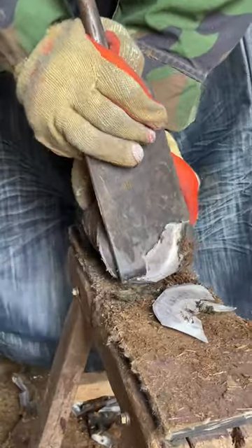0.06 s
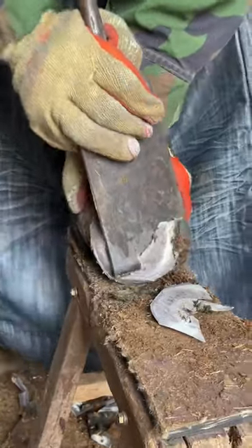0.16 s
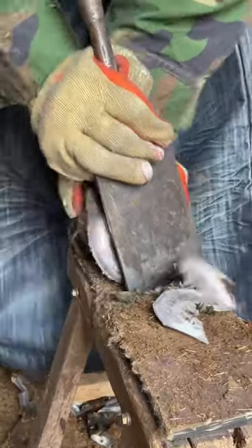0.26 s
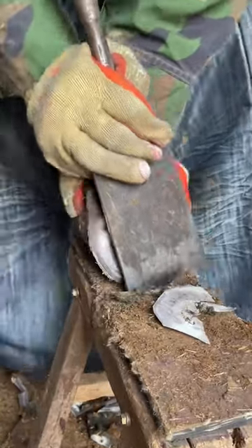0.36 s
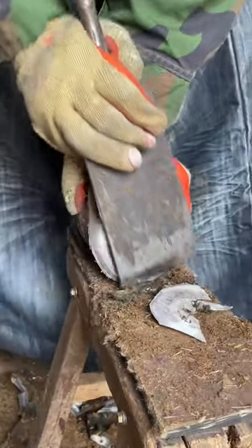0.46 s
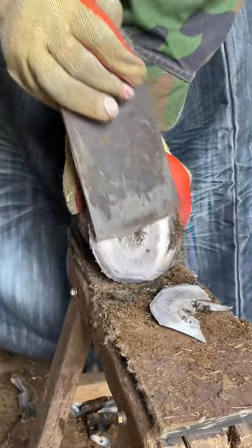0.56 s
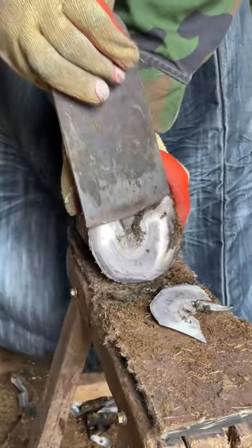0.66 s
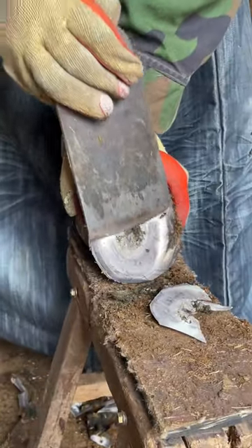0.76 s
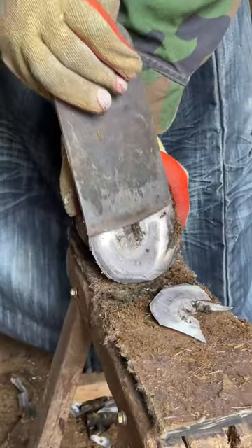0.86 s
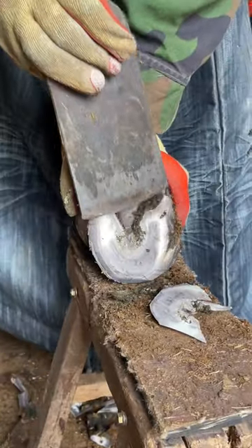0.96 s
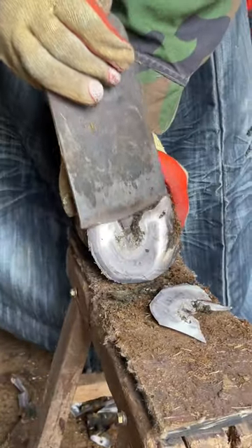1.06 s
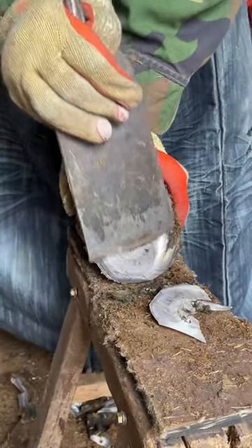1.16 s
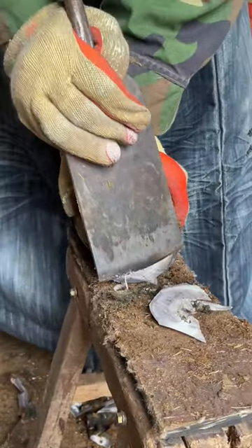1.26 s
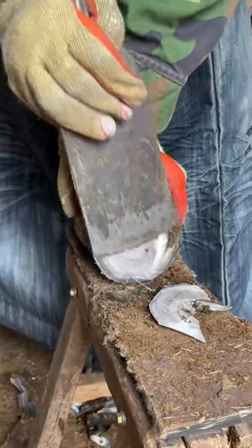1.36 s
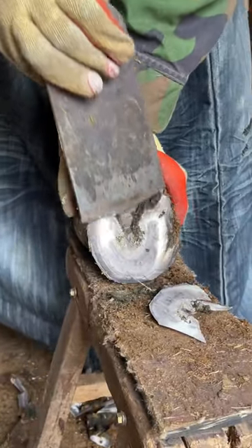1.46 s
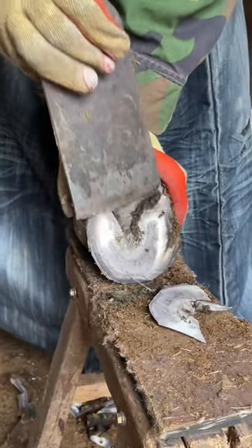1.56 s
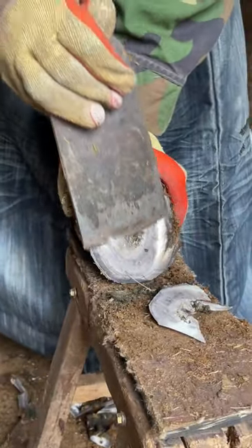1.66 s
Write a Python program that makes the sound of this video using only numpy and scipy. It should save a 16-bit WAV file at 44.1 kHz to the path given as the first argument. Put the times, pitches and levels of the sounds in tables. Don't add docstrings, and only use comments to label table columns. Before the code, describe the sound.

A flat blade pares a hoof: faint scraping, a few crackles, then one hard sharp snap with a short woody thud, a smaller knock, and quiet dry scraping; close stereo microphones in a quiet yard.

```python
import sys
import numpy as np
from scipy import signal
from scipy.fft import rfft, irfft, next_fast_len
from scipy.io import wavfile
from scipy.ndimage import uniform_filter1d, map_coordinates

SR = 44100
rng = np.random.default_rng(int(sys.argv[2]) if len(sys.argv) > 2 else 0)


def volts_from_db(level):
    exponent = np.asarray(level, float) / 20
    return 10 ** exponent


def persist_wave(psi):
    counts = np.round(np.clip(psi, -1, 1) * 32767).astype(np.int16)
    wavfile.write(sys.argv[1], SR, np.atleast_2d(counts).T)


N = 74970

# [t/s, peak level/dB, t60/s, tilt/(dB per octave)]
FIBRE_SNAPS = [(.008, -31.5, 0.024, 6), (0.162, -26, 0.013, 13.5), (0.187, -36, 0.022, 42),
               (0.1984, -16, 0.0076, 9.5), (0.2069, -23, 0.081, 1), (0.2121, -22, 0.011, -17),
               (0.2271, -19.5, 0.025, 2), (0.2484, -34, .02, 4), (0.2514, 0, 0.0028, -1),
               (0.2525, -4, 0.014, -0.5), (0.2549, -1, 0.0035, -4.5), (0.2556, -9.5, 0.026, -10.5),
               (.432, -21.5, 0.0086, -2.5), (0.441, -28.5, 0.033, -11.5), (.456, -33, 0.027, -19),
               (0.465, -36.5, 0.021, 3), (0.519, -32, 0.019, 22), (0.564, -38, 0.013, 10),
               (0.6107, -30.5, 0.011, 2), (.624, -39.5, 0.0049, 20), (.678, -38, 0.027, -6),
               (0.748, -39.5, 0.018, -2.5), (1.316, -40, 0.02, 9.5), (1.53, -43.5, 0.023, 14)]
# [f/Hz, level/(dB per Hz)]
CRACK_SPECTRUM = [(250, -42), (800, -12), (1800, -1), (4100, -6.5), (5200, -4), (9500, -9), (12000, -27),
                  (15500, -53)]
SNAP_RISE_S, SNAP_RING_DB = 0.00011, -30
SPIKE, SPIKE_S = 1.5, .0007
SNAP_TILT_TOP_HZ = 8000
# [t/s, level/dB]
TEAR_LEVEL = [(.183, -80), (.188, -48), (.2, -42), (.222, -44), (.243, -40), (.251, -27), (.262, -34),
              (.3, -51), (.35, -72)]

# [f/Hz, width/Hz, level/dB]
BLADE_MODES = [(950, 54, -9), (1535, 122, 1), (2273, 89, 1), (3410, 79, -8), (4790, 80, 2.5),
               (5596, 60, 2.5), (6200, 76, -1), (7300, 410, -5), (8390, 130, 4), (9030, 230, -0.5),
               (9200, 170, 0), (10580, 127, 3), (12800, 93, -1), (14900, 74, 10)]
BURIED_DAMPING = 3

# [t/s, f/Hz, peak level/dB, length/s, lean (below
KNOCKS = [(.198, 2330, -29, 0.011, 0.3), (.2058, 2260, -32, 0.0057, 0.38), (0.2084, 1740, -34, 0.013, 1),
          (0.2236, 418, -21.5, 0.0057, 0.81), (0.2295, 208, -29.5, 0.01, 0.84),
          (0.225, 950, -25.5, 0.0082, 0.64), (.249, 1870, -17, 0.0026, .8),
          (0.2534, 1511, -16.5, 0.01, 0.85), (0.2547, 412, -11, 0.0081, 1.15),
          (0.2554, 243.6, -19, 0.026, 0.61), (.2575, 515, -26, 0.0064, 1.75),
          (0.2599, 116.5, -14.5, 0.022, 0.5), (0.264, 430, -26, 0.012, 0.35),
          (.265, 930, -24.5, 0.0074, 0.36), (0.5073, 296, -25.5, 0.015, 0.57),
          (0.5153, 281, -27, 0.014, 1.9), (.746, 2270, -51, .04, 0.24), (.52, 2264, -53.5, 0.056, 1),
          (.432, 1044, -39, 0.006, 0.66), (.452, 1510, -42, 0.013, .9), (1.14, 2285, -42.5, 0.051, 1.3),
          (1.386, 2290, -51, 0.052, 0.69), (1.382, 1440, -52, 0.046, 0.85),
          (1.497, 2290, -51.5, 0.063, 0.5), (.025, 69, -35.5, .06, 1), (.199, 727, -32.5, 0.0056, 0.81),
          (.2272, 2000, -25.5, .004, .6), (.335, 261, -44.5, 0.06, 0.97), (.549, 178, -34, 0.014, 0.39),
          (.585, 219.3, -44.5, 0.053, 1.3), (.735, 173, -43.5, 0.045, 1.2), (1.62, 449, -53.5, 0.057, 0.71),
          (1.197, 208.5, -41.5, .061, 0.73), (1.42, 171.4, -42, 0.055, 0.96)]
# [f/Hz, t60/s]
RATTLE_DECAY = [(200, .35), (1000, .3)]
RATTLE_DB = -19

# [t/s, level/dB]
SCRAPE_LEVEL = [(0, -50.5), (.14, -57.5), (.3, -46.5), (.38, -48.5), (.44, -40.5), (.55, -50.5),
                (.72, -52.5), (.8, -62), (.86, -55.5), (1.07, -57), (1.16, -52), (1.26, -53), (1.285, -61),
                (1.33, -58), (1.46, -59.5), (1.52, -56.5), (1.6, -60), (1.7, -52)]
# [t/s, level/dB]
RING_LEVEL = [(0, -8.5), (.46, -15.5), (.54, -9), (.8, -9.5), (1.08, 2), (1.13, 4.5), (1.165, 3),
              (1.25, -1), (1.3, -11.5), (1.36, 1), (1.41, 8.5), (1.46, 0.5), (1.52, 1.5), (1.56, -4),
              (1.6, 4), (1.7, 8.5)]
# [f/Hz, level/(dB per Hz)]
HORN_SPECTRUM = [(300, 6.5), (700, 1.5), (1500, -4), (3000, -1.5), (4200, -4.5), (9500, -7), (11500, -26.5),
                 (15000, -46)]
SLIPS_PER_S, SLIP_SPREAD_DB = 1900, 3.5
FRICTION_GRIT, TEAR_GRIT = 0.58, 0.97
HISS_PATCHY_DB, RING_PATCHY_DB = 3, 2.5

# [t/s, resonance f/Hz, level/dB]
SLIDE = [(1.318, 6700, -75), (1.335, 6500, -57), (1.343, 5800, -58), (1.352, 5600, -61), (1.356, 3700, -61),
         (1.372, 3700, -55), (1.405, 3650, -58), (1.42, 3250, -55), (1.45, 2800, -70)]
SLIDE_WIDTH_HZ = 800
# [t/s, f/Hz, peak level/dB, length/s, lean]
FLECKS = [(.04, 11500, -69.5, .05, 2.1), (.468, 11600, -54.5, .014, 0.97), (.462, 9400, -52, .018, .6),
          (.5, 8000, -48, 0.028, 1), (.556, 14600, -68, .012, 1), (.55, 12840, -71, .04, 1),
          (.56, 6540, -53, 0.0092, .8), (.586, 9000, -50, .014, .7), (.677, 5600, -41, 0.0052, 0.61),
          (1.02, 2030, -54.5, 0.054, 1.3), (1.085, 15200, -76, .05, 1.2), (1.33, 12800, -92, 0.11, 1.1),
          (1.49, 14200, -75, .04, 1), (1.63, 14900, -72, .04, 1)]

# [t/s, length/s, level/dB]
DUST_PUFFS = [
    (0.257, .075, -64),
    (0.444, 0.081, -66),
    (0.494, 0.052, -66),
    (0.542, 0.039, -68),
    (0.71, 0.055, -73),
    (0.832, .045, -75.5),
    (1.08, 0.078, -69.5),
    (1.31, 0.031, -78),
    (1.612, 0.091, -67),
]
# [f/Hz, level/(dB per Hz)]
DUST_SPECTRUM = [(9500, -56), (11200, 9), (12500, -3), (15500, -5.5)]

# [f/Hz, t60/s]
ECHO_DECAY = [(200, 0.6), (1000, 0.23), (3000, 0.061), (8000, 0.055)]
ECHO_DB = -12
# [t/s, level/dB]
RUMBLE_LEVEL = [(0, -42), (.05, -42), (.1, -39.5), (.19, -44.5), (.3, -34), (.36, -43), (.41, -41.5),
                (.62, -40), (.69, -47.5), (.87, -46.5), (.925, -41), (.96, -44.5), (1.01, -41),
                (1.2, -42.5), (1.43, -41), (1.48, -46), (1.62, -45.5), (1.68, -44)]
# [f/Hz, level/(dB per Hz)]
RUMBLE_SPECTRUM = [(12, -7), (20, -70), (44, -3.5), (69, 2), (130, -8), (211, -15), (245, -18), (449, -31),
                   (500, -56), (650, -55), (1100, -120)]
EVEN_S = .05
# [f/Hz, level/(dB per Hz)]
AIR_SPECTRUM = [(30, 1.5), (150, -1), (300, -15.5), (600, -18), (1000, -17.5), (1500, -17.5), (1800, -23),
                (2200, -120)]
AIR_DB = -54.5

# [f/Hz, left minus right level/dB]
PORT_DB = [(40, -.6), (100, -1.8), (270, -4), (480, -5.5), (750, -3.5), (1250, -.5), (1600, 0)]
# [f/Hz, left lead/half turns]
PORT_TURN = [(2000, .05), (4450, .4), (5350, 1.85), (8600, 2.95), (9700, 3.06), (11700, 4), (13300, 4),
             (14900, 5)]
TOP_HZ = 15750
GATE_HZ = [
    [[8400]],
    [[10700]],
]
GATE_DB = -96
MASK_DB, MASK_HZ = 16, 1800


def unit(x):
    return x / np.sqrt(np.mean(x ** 2) + 1e-20)


def along(points, hz):
    f, value = np.transpose(points)
    return np.interp(np.log(hz + 1), np.log(f + 1), value)


def curves(rows):
    s, *columns = np.transpose(rows)
    return [np.interp(np.arange(N) / SR, s, column) for column in columns]


def wobble(rate):
    knots = rng.standard_normal(N // 50)
    return map_coordinates(knots, [np.arange(N) * rate / SR])


def filtered(x, response):
    n = x.shape[-1]
    m = next_fast_len(n + 8192)
    return irfft(rfft(x, m) * response(np.fft.rfftfreq(m, 1 / SR)), m)[..., :n]


def coloured(x, spectrum):
    return filtered(x, lambda hz: volts_from_db(along(spectrum, hz)))


def patchy(x, depth_db):
    z = signal.stft(x, nperseg=256)[2]
    field = uniform_filter1d(rng.standard_normal(z.shape), 4, 0)
    field = uniform_filter1d(field, 12, 1)
    return signal.istft(z * volts_from_db(depth_db * unit(field)), nperseg=256)[1][:N]


def slips(grit):
    chance, size = rng.random((2, N))
    strength = volts_from_db(-SLIP_SPREAD_DB * np.log(size + 1e-9))
    grains = (chance < SLIPS_PER_S / SR) * strength * rng.choice([-1, 1], N)
    return grit * unit(grains) + rng.standard_normal(N)


def steel(f, damping=1):
    response = 0
    for k, (centre, width, db) in enumerate(BLADE_MODES):
        loss = 1j * f * width * damping
        response = response + (-1) ** k * volts_from_db(db) * loss / (centre * centre - f * f + loss)
    return response


def snaps():
    out, t = np.zeros(N + 4096), np.arange(4096) / SR
    onset = (1 - np.exp(-t / SNAP_RISE_S)) * (1 + SPIKE * np.exp(-t / SPIKE_S))
    for s, db, t60, tilt_db in FIBRE_SNAPS:
        def brightness(hz):
            octaves = np.log2((np.minimum(hz, SNAP_TILT_TOP_HZ) + 500) / 3000)
            return volts_from_db(along(CRACK_SPECTRUM, hz) + tilt_db * octaves)

        burst = unit(filtered(rng.standard_normal(4096), brightness))
        out[round(s * SR):][:4096] += volts_from_db(db - 7.5 - 60 * t / t60) * onset * burst
    out = out[:N]
    return out + volts_from_db(SNAP_RING_DB) * filtered(out, lambda hz: steel(hz, BURIED_DAMPING))


def tear():
    level_db = curves(TEAR_LEVEL)[0] + 2.3 * wobble(181.64)
    return volts_from_db(level_db) * unit(coloured(slips(TEAR_GRIT), CRACK_SPECTRUM))


def swings(rows):
    out = np.zeros(N)
    for s, hz, db, length, lean in rows:
        t = np.arange(N) / SR - s
        bell = np.sin(np.pi * np.clip(t / length, 0, 1) ** lean) ** 2
        out += volts_from_db(db) * bell * np.sin(2 * np.pi * hz * t)
    return out


def scrape():
    hiss = coloured(patchy(slips(FRICTION_GRIT), HISS_PATCHY_DB), HORN_SPECTRUM)
    hiss = unit(hiss) * volts_from_db(0.87 * wobble(40.54))
    drive = coloured(patchy(slips(FRICTION_GRIT), RING_PATCHY_DB), HORN_SPECTRUM)
    ring = unit(filtered(drive, steel)) * volts_from_db(curves(RING_LEVEL)[0])
    return volts_from_db(curves(SCRAPE_LEVEL)[0]) * (hiss + ring)


def slide():
    centre_hz, level_db = curves(SLIDE)
    slow = filtered(rng.standard_normal((2, N)), lambda hz: 1 / (1 + (2 * hz / SLIDE_WIDTH_HZ) ** 4))
    slow = unit(slow)
    phase = 2 * np.pi * np.cumsum(centre_hz) / SR
    return volts_from_db(level_db) * (slow[0] * np.cos(phase) + slow[1] * np.sin(phase))


def dust():
    t = np.arange(N) / SR
    puffs = np.zeros(N)
    for s, length, db in DUST_PUFFS:
        puffs += volts_from_db(db) * np.sin(np.pi * np.clip((t - s) / length, 0, 1))
    return puffs * unit(coloured(patchy(rng.standard_normal(N), 6.3), DUST_SPECTRUM))


def echo(x, decays):
    hz, t, z = signal.stft(rng.standard_normal((2, SR // 2)), SR, nperseg=256)
    decay = volts_from_db(-60 * t / along(decays, hz)[:, None])
    tail = signal.istft(z * decay, SR, nperseg=256)[1]
    return signal.fftconvolve(x[None], tail / np.linalg.norm(tail[0]), axes=1)[:, :N]


def rattle(stool):
    upper = filtered(stool, lambda hz: hz / (hz + 300))
    return volts_from_db(RATTLE_DB) * echo(upper, RATTLE_DECAY)[0]


def rumble():
    drone = coloured(rng.standard_normal(N), RUMBLE_SPECTRUM)
    power = uniform_filter1d(drone ** 2, round(EVEN_S * SR))
    power = uniform_filter1d(power, round(EVEN_S * SR / 2))
    return volts_from_db(curves(RUMBLE_LEVEL)[0]) * drone / np.sqrt(np.abs(power))


def yard_air():
    return volts_from_db(AIR_DB) * unit(coloured(rng.standard_normal((2, N)), AIR_SPECTRUM))


def scene():
    cracks, stool = snaps() + tear(), swings(KNOCKS)
    near = cracks + stool + rattle(stool)
    near = near + scrape() + slide() + swings(FLECKS) + dust() + rumble()
    return near + volts_from_db(ECHO_DB) * echo(cracks, ECHO_DECAY) + yard_air()


def gate(x):
    hz, _, z = signal.stft([x[0] + x[1], x[0] - x[1]], SR, nperseg=1024)
    hz = hz[:512, None]
    band = np.sqrt(np.mean(abs(z[:, :512].reshape(2, 64, 8, -1) / 2) ** 2, 2))
    band = np.repeat(band, 8, 1)
    faint = (band < volts_from_db(GATE_DB)) & (hz > GATE_HZ)
    masked = (band < volts_from_db(-MASK_DB) * band[::-1]) & (hz > MASK_HZ)
    z[:, :512] *= ~(faint | masked)
    mid, side = signal.istft(z, SR, nperseg=1024)[1][:, :N] / 2
    return np.array([mid + side, mid - side])


def roll_off(x):
    return signal.sosfilt(signal.butter(12, 15730, fs=SR, output="sos"), x)


def record(dry):
    side = np.array([[.5], [-.5]])

    def ports(hz):
        half_turns = np.interp(hz, *np.transpose(PORT_TURN))
        level = volts_from_db(side * along(PORT_DB, hz))
        return level * np.exp(1j * np.pi * side * half_turns) * (hz < TOP_HZ)

    mix = gate(filtered(dry, ports))
    return roll_off(mix)


dry = scene()
out = record(dry)
persist_wave(out)
```